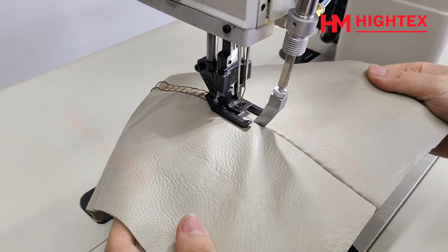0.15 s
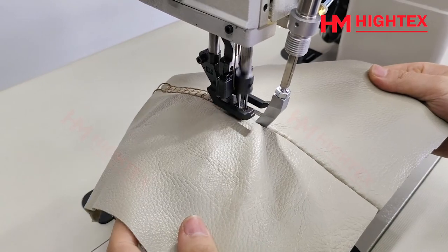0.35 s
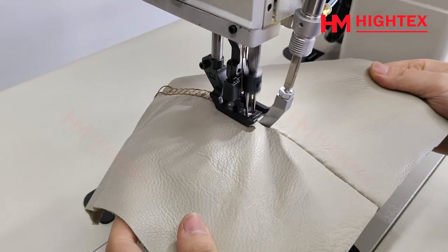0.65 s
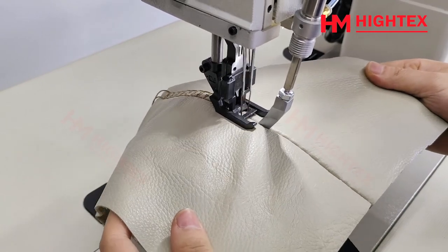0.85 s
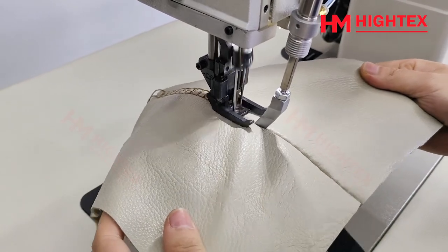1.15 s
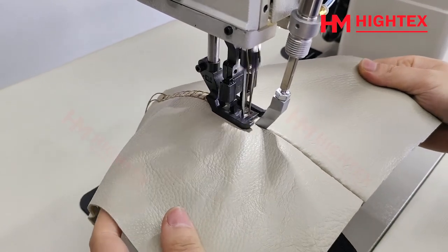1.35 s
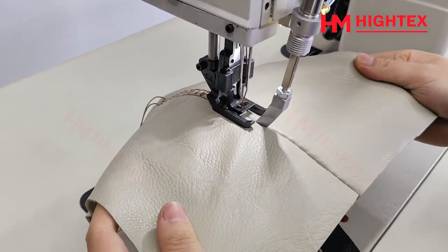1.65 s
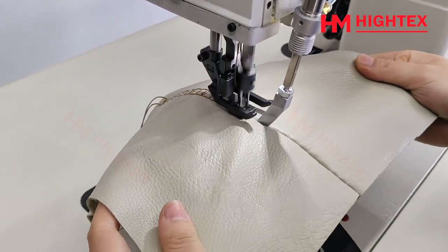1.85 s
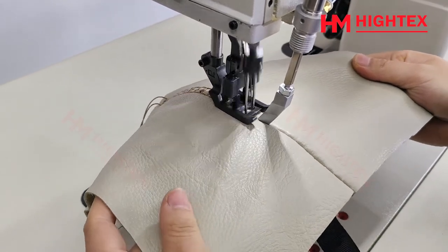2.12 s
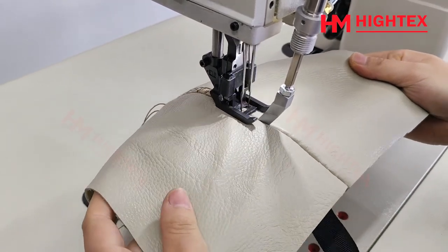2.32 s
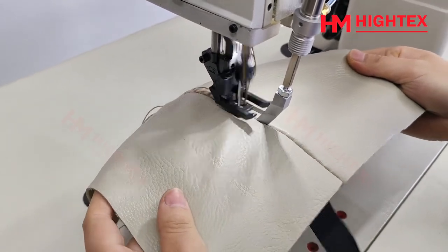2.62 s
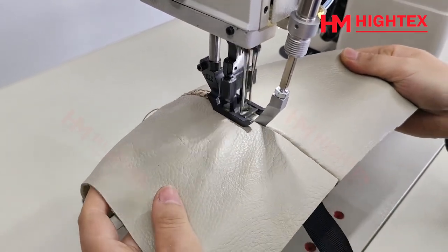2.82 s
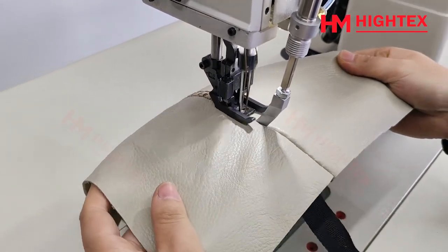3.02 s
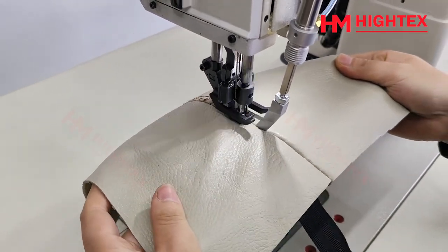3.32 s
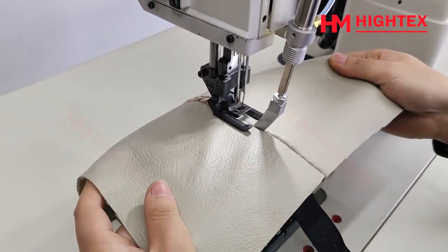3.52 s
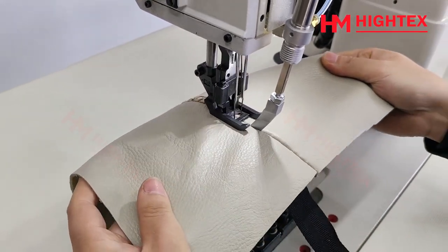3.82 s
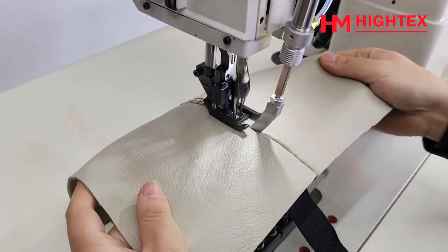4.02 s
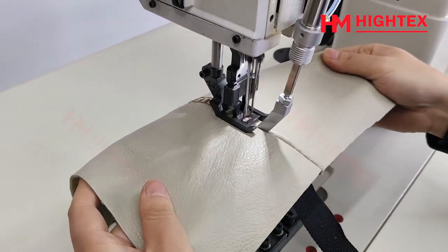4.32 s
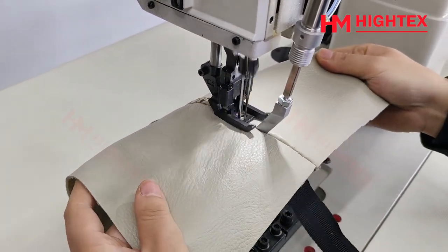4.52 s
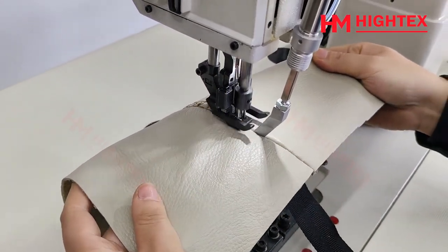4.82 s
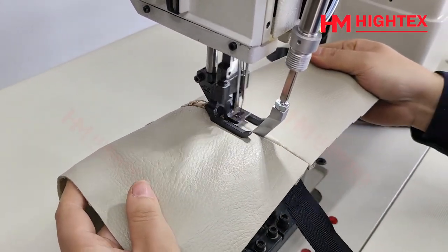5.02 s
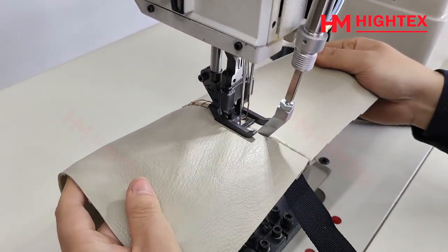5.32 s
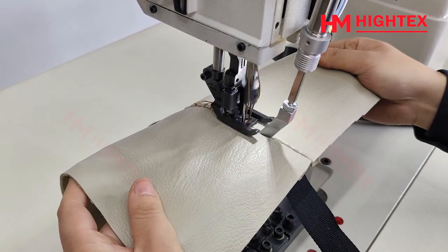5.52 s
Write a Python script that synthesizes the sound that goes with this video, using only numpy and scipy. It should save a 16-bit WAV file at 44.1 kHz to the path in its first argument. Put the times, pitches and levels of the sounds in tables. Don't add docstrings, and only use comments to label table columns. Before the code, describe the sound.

A close, dry stereo recording of an industrial sewing machine stitching leather slowly in a quiet indoor workshop. It starts right on a dull, low thud at 0 s; further thuds follow at about 0.75, 1.5, 2.25, 3.0, 3.75, 4.5 and 5.25 s. Each is a short boom near 90 Hz that jars the table panels into a brief rattle, brightest at 0.75 and strong at 3.0, softer at 3.75. About 0.1 s after each thud comes a needle click, at 0.2 s a sharp hook click, then lighter ticks. Near 0.47 s into each stitch the feet lift with a bright clack, followed by take-up clicks and a small snap, then a light touch just before the next thud. Faint high metallic pings occur at 3.9 and 4.7 s. Soft gear murmur and a very faint high whine remain beneath, the gaps nearly empty, until it cuts off mid-stitch around 5.6 s.

```python
import sys
import numpy as np
from scipy import signal
from scipy.io import wavfile
from scipy.ndimage import uniform_filter1d

SR = 44100
rng = np.random.default_rng(int(sys.argv[2]) if len(sys.argv) > 2 else 0)


def dump_mix(stems):
    frames = np.atleast_2d(stems).T
    limited = np.clip(frames, -1, 1)
    pcm = np.round(limited * 32767).astype(np.int16)
    wavfile.write(sys.argv[1], SR, pcm)


def invert_db(level):
    return 10 ** (np.asarray(level, dtype=float) / 20)


N = 249606

# crest_s, swing_db, pitch_hz, low_rattle_db, high_rattle_db
SLAMS = [
    (0.0099, -25.5, 90.4, -56, -66),
    (0.7578, -24.5, 88.4, -44.5, -46),
    (1.504, -25, 94.8, -41, -52.5),
    (2.252, -27.5, 90.2, -45.5, -61),
    (2.9993, -26, 90.2, -38, -49.5),
    (3.748, -28, 89.3, -51, -66.5),
    (4.496, -25.5, 91.1, -38.5, -67),
    (5.2429, -26, 89.4, -43.5, -55),
]
# crest_s, swing_db, width_s, rattle_db
REBOUNDS = [
    (0.0853, -88, 0.33, -53),
    (0.8377, -64, 0.2, -57),
    (1.5753, -45, 0.021, -56.5),
    (2.3323, -73, 0.0082, -67),
    (3.102, -50, 0.045, -60),
    (3.8461, -78, 0.033, -65),
    (4.5854, -48.5, 0.039, -80),
    (5.3423, -51.5, 0.032, -67),
]
# crest_s, swing_db, width_s, rattle_db
NEEDLE_LOW = [
    (0.199, -59, 0.027, -62.5),
    (0.9496, -48.5, 0.036, -63.5),
    (1.6837, -53, 0.054, -68),
    (2.4315, -55, 0.052, -62.5),
    (3.1789, -46.5, 0.051, -68),
    (3.937, -47.5, 0.08, -67),
    (4.6849, -46.5, 0.11, -64),
    (5.4345, -44.5, 0.12, -68),
]
# crest_s, swing_db, width_s, rattle_db
FEED_PUSH = [
    (1.1318, -53, 0.05, -75.5),
    (1.88, -52, 0.057, -78),
    (2.6151, -61.5, 0.039, -86),
    (3.3719, -56, 0.04, -77),
    (4.119, -52, 0.061, -79),
    (4.848, -61.5, 0.02, -104),
    (5.607, -78, 0.027, -68.5),
]
# crest_s, swing_db, width_s, rattle_db
FOOT_LIFT = [
    (0.5215, -48, 0.083, -73),
    (1.2786, -55.5, 0.061, -69),
    (2.0278, -54.5, 0.075, -75),
    (2.773, -50.5, 0.091, -80.5),
    (3.522, -53, 0.12, -68.5),
    (4.2705, -51.5, 0.082, -71.5),
    (5.018, -50, 0.094, -72.5),
]
# swings, pitch_hz, high_rattle_over_low_db
LIGHT_SWINGS = [
    (REBOUNDS, 98, -11),
    (NEEDLE_LOW, 89, -7.5),
    (FEED_PUSH, 95, -3.5),
    (FOOT_LIFT, 95.2, -5.5),
]
# pitch_hz, width_hz, level_db
LOW_PANELS = [(150.4, 13.5, 4), (195.4, 14, 0.5), (213.5, 9.4, -8)]
HIGH_PANELS = [(249.4, 34, 2), (301.8, 10, -3.5), (345, 31, -1), (430, 23, 0.5), (466, 48, 0.5),
               (619, 26, 0.5), (730.6, 27, 0)]

# pitch_hz, width_hz, level_db
NEEDLE_BAR = [(11973, 260, 1), (13600, 1660, -1.5), (15240, 2400, -3.5), (10040, 2000, -12)]
ARM = [(957, 117, 0), (1037, 53, 1), (1145, 44, 1), (757, 200, -6)]
BED_PLATE = [(3240, 3870, 4), (3852, 480, 0), (4110, 240, -5.5), (4790, 680, -0.5), (5510, 340, -11.5)]
HOOK = [(6584, 690, -3.5), (7860, 1020, -2), (8910, 2840, -5.5)]
LINKAGE = [(2000, 45, -2), (2140, 50, -7.5), (2263, 180, -2.5), (1506, 190, -4.5)]
# start_s, needle_bar_db, weight_db (what the other parts gain this time)
FOOT_DOWN = [
    (0.7153, -41.5, 2),
    (0.7265, -35, 0),
    (1.4635, -42, 2),
    (2.2114, -43, 2.5),
    (2.9587, -43, 3.5),
    (3.7063, -45.5, 2),
    (4.4523, -45.5, 3),
    (5.1992, -43, -8),
]
FOOT_BLOW = [
    (0., -52, 5.5),
    (0.7394, -39.5, 2),
    (1.4854, -46.5, 2),
    (2.2314, -49, 0),
    (2.98, -41, -1.5),
    (3.724, -54, -5),
    (4.4714, -40.5, -9.5),
    (5.2214, -45, -14),
]
NEEDLE_IN = [(0.099, -35.5, -2, -21), (0.841, -36.5, 3, -13), (0.848, -45, -2, 10.5),
             (1.5948, -38.5, 5, -3), (2.3337, -38, -13, 2), (2.3396, -39, 5, 0.5), (3.089, -41, 9.5, -5),
             (3.8307, -35.5, -2, 2.5), (4.57, -56.5, 10, 4), (4.584, -37.5, 5.5, -0.5),
             (5.3273, -34.5, -42, 0), (5.3333, -37, -3.5, 2)]
HOOK_CATCH = [
    (0.1955, -37.5, 8.5, -13),
    (0.9401, -42, -3, 18),
    (1.6865, -39, 2, 11.5),
    (2.4356, -41.5, -2, 3),
    (3.1858, -37.5, -1.5, 8.5),
    (3.931, -43.5, 11, 1),
    (4.6778, -41.5, 22, -5.5),
    (5.4264, -40, 0, -7),
]
# start_s, needle_bar_db, weight_db
HOOK_PASS = [
    (0.965, -44.5, 3.5),
    (1.714, -42.5, 1),
    (2.459, -43, 3),
    (3.2121, -43.5, -3),
    (3.9602, -35, -34),
    (4.7085, -53, 11.5),
    (5.452, -40, -10.5),
]
NEEDLE_OUT = [
    (0.2635, -46.5, -0.5),
    (1.0115, -49, -2),
    (1.7617, -49.5, -8),
    (2.507, -46.5, -5),
    (3.255, -51, 3.5),
    (4.0013, -47, -4),
    (4.7416, -49, 4),
    (5.4974, -47, 1.5),
]
SIDE_STEP = [
    (4.012, -53, -3),
    (4.087, -52, -9),
    (4.108, -63, -9),
    (1.0705, -44.5, 1),
    (2.5653, -46, 10.5),
    (4.061, -46.5, 1.5),
    (5.5578, -44.5, -1),
]
FEED_DOG = [
    (0.348, -52, -4),
    (1.0954, -57, -7),
    (1.8334, -53.5, -0.5),
    (3.3393, -54.5, -1),
    (4.0869, -57, -2),
    (4.8349, -51, -8.5),
    (5.5994, -65.5, 4),
]
# start_s, needle_bar_db, weight_db, linkage_over_arm_db
FOOT_UP = [
    (0.4653, -31, 1, -1),
    (1.2207, -39.5, -2, 8),
    (1.9653, -37, 7, -3.5),
    (2.7131, -35.5, 0.5, -1.5),
    (3.4538, -42, 8.5, -24),
    (3.4615, -33.5, 1, 3.5),
    (4.2067, -38.5, 4, -7.5),
    (4.9536, -32, 2, -7.5),
    (4.9546, -49, -17, -13),
]
TAKE_UP = [(0.5715, -39, -4, -10), (0.599, -53.5, 17.5, -2), (1.3162, -41, 5.5, 3), (2.0657, -44, 6.5, 9.5),
           (2.812, -49, -1.5, 14), (2.8357, -48.5, -5.5, 22), (3.5606, -47.5, -6, 18),
           (3.5867, -49.5, -0.5, 16), (4.3096, -40, 1, 6), (5.0564, -48.5, 2.5, 4), (5.0818, -51, 5, -2)]
# start_s, needle_bar_db, weight_db
THREAD_SNAP = [
    (0.635, -32.5, 6.5),
    (1.386, -42.5, -8),
    (2.133, -39.5, 5),
    (2.8814, -44, -9),
    (3.6286, -46, 5),
    (4.376, -46.5, 4.5),
    (5.124, -44, 6),
]
FOOT_SLACK = [
    (1.4424, -46.5, 0),
    (2.9362, -46, 0),
    (4.4323, -45, 0),
]
# contacts, (arm, bed_plate, hook)_over_needle_bar_db, share of weight each takes,
# tail_t60_s, crack_t60_s
CONTACTS = [(FOOT_DOWN, (-16.5, -9, -11), (4.3, 0.3, 0.16), 0.28, 0.016), (FOOT_BLOW, (-6.5, 1.5, -6),
            (0.21, 2.37, 0.47), 0.14, 0.01), (NEEDLE_IN, (-7, -6, -10), (1, 0.14, 0.014), 0.27, 0.013),
            (HOOK_CATCH, (-15.5, -12, 0.32), (0.74, .1, 0.16), 0.22, 0.0071), (HOOK_PASS, (-21.5, -5, -2),
            (2.27, 0.52, 0.25), 0.17, 0.015), (NEEDLE_OUT, (-75, -14, -2.4), (1.1, 1, 0.83), 0.24, 0.027),
            (SIDE_STEP, (-28, -20, -12.5), (0.96, 0.61, 0.51), 0.3, 0.0094), (FEED_DOG, (0, -13, -32),
            (0.94, 0.3, .3), 0.18, 0.0052), (FOOT_UP, (-6.5, -5.5, -8), (1.72, 0.35, 0.057), 0.29, 0.012),
            (TAKE_UP, (-17, -13.5, -1.4), (1, 0.89, 0.21), 0.29, 0.018), (THREAD_SNAP, (-52, -14.5, -6.5),
            (1.1, 1.74, 0.16), 0.18, 0.024), (FOOT_SLACK, (-50, -30, -7), (0, 0, 0), 0.09, 0.012)]
# start_s, needle_bar_db, other_parts_over_it_db
BOUNCES = [(0.188, -55, 9), (0.222, -51, 8), (0.4694, -39, -12), (0.476, -45, 5.5), (0.4826, -37, -12),
           (0.513, -46, 2), (0.604, -46, 1), (0.7265, -46, -15), (0.7308, -42, -7), (0.845, -35.5, -21),
           (0.849, -39, -15), (0.9433, -41, -20), (1.212, -40, -13), (1.223, -30.5, -17), (1.228, -41, -9),
           (1.3355, -55, -2), (1.6916, -54, 6), (1.7138, -56, 2), (1.7652, -45, -6), (1.9592, -60, -18),
           (1.9696, -26, -18), (2.1365, -54, -15), (2.1408, -53, -2), (2.2181, -44, -16), (2.3417, -34, -3),
           (2.4372, -42, -3), (2.7048, -41, -7), (2.742, -60.5, 18), (2.8117, -48, -1), (2.837, -40, -12),
           (2.8437, -42, -13), (3.091, -40, -24), (3.0965, -37, -26), (3.181, -59, 10), (3.4655, -30, -7),
           (3.7054, -45, -13), (3.8386, -40, -6), (4.202, -42.5, -3), (4.209, -33, -21), (4.225, -59, 15),
           (4.304, -48, 6), (4.309, -55, 0), (4.3269, -50, -1), (4.335, -49, 1), (4.455, -42, -4),
           (4.685, -53, 11), (4.711, -48, 6), (4.9611, -27, -4.5), (5.1324, -44, -16),
           (5.3293, -31.5, -5.5), (5.3365, -36, -3), (5.348, -51, -10), (5.4591, -44, 0), (5.502, -50, -11),
           (5.508, -54, 2), (5.57, -46, -9)]

# pitch_hz, width_hz, level_db
FOOT = [(1800, 240, -0.5), (3397, 180, -3), (3570, 20, -10), (5530, 350, -12.5)]
# start_s, level_db
FOOT_RINGS = [
    (0., -45),
    (0.7378, -45.5),
    (0.749, -51),
    (1.481, -42),
    (2.2323, -52.5),
    (2.978, -49.5),
    (3.721, -61),
    (4.4715, -70.5),
    (5.2206, -57.5),
]
# middle_s, level_db, pitch_hz, length_s
PANEL_HUMS = [(0.024, -42.5, 265.5, 0.045), (0.043, -51, 345, .04), (0.228, -61, 258.7, 0.084),
              (0.503, -64, 614, 0.046), (0.664, -63.5, 406, 0.064), (0.749, -62.5, 913, 0.048),
              (0.81, -41, 207, 0.039), (0.873, -61.5, 623, 0.056), (0.972, -65, 408, 0.048),
              (1.255, -66.5, 254.5, 0.057), (1.344, -63.5, 632, 0.047), (1.512, -53, 526, 0.046),
              (1.63, -61.5, 262, 0.056), (1.718, -74, 407, 0.1), (2.035, -67.5, 255, 0.082),
              (2.119, -70, 432, 0.12), (2.253, -60.5, 640, 0.037), (2.268, -52.5, 251.7, 0.046),
              (2.365, -63, 627, 0.047), (2.374, -70, 263, 0.034), (2.737, -65, 642, 0.07),
              (2.994, -49, 663.5, 0.034), (3.01, -50, 469.4, 0.044), (3.12, -52.5, 185.5, 0.11),
              (3.222, -68, 261.5, 0.069), (3.332, -66.5, 188, 0.046), (3.484, -54, 620, 0.044),
              (3.561, -72, 254, 0.14), (3.568, -67.5, 674, 0.047), (3.758, -59, 458, 0.044),
              (3.871, -64.5, 400, 0.063), (4.33, -64, 246, 0.073), (4.495, -66, 555, 0.058),
              (4.69, -66, 491, 0.049), (4.687, -68, 905, .04), (5.0, -59.5, 162.6, 0.041),
              (5.28, -55, 430, 0.036), (5.13, -68, 137, 0.051), (5.263, -60, 706, 0.05),
              (3.015, -39, 188.5, 0.039), (0.062, -41.5, 197.7, 0.033), (0.786, -46.5, 325.6, 0.028),
              (1.53, -54, 187, .03), (5.427, -59.5, 503, 0.014), (5.59, -67.5, 150.4, 0.065),
              (3.355, -68.5, 475, 0.046), (3.47, -64.5, 149, 0.067), (2.593, -68.5, 191, 0.036),
              (4.33, -68, 159, 0.053)]
# middle_s, level_db, pitch_hz, length_s
PART_RINGS = [(0.017, -53.5, 3460, 0.026), (0.098, -57, 3600, 0.014), (0.375, -73, 1670, .035),
              (0.478, -47, 4720, 0.0057), (0.48, -46, 1007, 0.012), (0.509, -49.5, 2140, 0.021),
              (0.748, -49, 3470, 0.017), (1.122, -77.5, 1504, 0.019), (2.002, -54.5, 1030, 0.023),
              (2.348, -55.5, 1800, 0.019), (2.751, -58, 3650, 0.018), (2.842, -59, 2010, .015),
              (3.852, -58.5, 2093, 0.029), (4.116, -71, 1470, 0.034), (4.22, -62, 4080, .01),
              (4.349, -68.5, 1500, 0.035), (4.856, -71.5, 1650, 0.025), (4.955, -51, 4050, 0.0057),
              (4.963, -49, 1063, 0.0067), (5.125, -57, 4430, 0.0095), (5.479, -68, 1370, 0.022),
              (1.623, -56, 1103, .04), (1.491, -52, 5300, .012), (2.135, -59, 4800, .01)]
# start_s, level_db, pitch_hz
TICKS = [
    (0.7143, -43, 13800),
    (3.705, -42, 13600),
    (3.9317, -32.5, 6700),
    (4.681, -36, 7050),
    (5.2007, -45, 13200),
]

# time_s, level_db
LOAD = [
    (0.0, 10.5),
    (0.35, 1),
    (0.84, 3),
    (2.0, 0.5),
    (2.25, 3),
    (2.8, 0),
    (3.2, -1.5),
    (4.3, 1),
    (5.3, 2.5),
    (5.66, 2.5),
]
# pitch_hz, width_hz, level_db
GEAR_CASE = [(735, 15, -1), (1070, 41, -10), (5300, 900, -13)]
# pitch_hz, level_db
MURMUR_COLOUR = [(300, -12.5), (500, -6), (733, -4), (1150, -8.5), (3000, -22.5), (6500, -24.5),
                 (12000, -31.5), (16000, -14.5)]
RUMBLE_COLOUR = [(30, -43.5), (120, 1), (250, -17.5), (420, -11), (550, -22.5), (16000, -53)]
# pitch_hz, width_hz, level_db
WHINE = [(10000, 6, 0), (9904, 8, -7), (14856, 40, -6)]
# time_s, level_db
WHINE_LOAD = [(0, -81), (0.5, -87.5), (1.2, -85.5), (1.9, -85.5), (2.4, -85), (3, -85), (4.15, -76.5),
              (4.3, -100), (4.6, -91), (5.66, -88)]
# pitch_hz, likeness (0 to 1)
SAME = [(60, .99), (250, .8), (500, .5), (1000, .4), (4000, .35), (16000, .35)]
# pitch_hz, left_leads_rad
LEAD = [(300, 0), (520, -.4), (780, -2.8), (1210, -4.1), (1640, -2.9), (2070, -4.3), (2840, -9.8),
        (5170, -6.6)]
# pitch_hz, left_over_right_db
LEAN = [(640, 0), (1400, -1), (3100, -.5), (6800, 2), (11000, 6.5), (15000, 11)]


def evened(x):
    return x / np.sqrt(np.mean(x ** 2) + 1e-20)


def read(points, hz):
    f, value = np.transpose(points)
    return np.interp(np.log(hz + 1), np.log(f + 1), value)


def add(mix, s, sound):
    at = round(s * SR)
    sound = sound[max(-at, 0):]
    part = mix[max(at, 0):][:len(sound)]
    part += sound[:len(part)]


def ports(colour=((20, 0), (20000, 0)), patchy_db=0.):
    frames, hz = N // 128 + 5, np.fft.rfftfreq(512, 1 / SR)
    a, b, c, d, patch = rng.standard_normal((frames, 257, 5)).T
    patch = uniform_filter1d(uniform_filter1d(patch, size=6, axis=0), size=20, axis=1)
    level = invert_db(read(colour, hz)[:, None] + patchy_db * evened(patch))
    same = np.clip(read(SAME, hz), 0, 1)[:, None]
    left = a + 1j * b
    right = same * left + np.sqrt(1 - same ** 2) * (c + 1j * d)
    right = right * np.exp(-1j * read(LEAD, hz))[:, None]
    lean = invert_db(read(LEAN, hz) / 2)[:, None]
    z = np.array([left * lean, right / lean]) * level
    pair = signal.istft(z, nperseg=512, noverlap=384)[1][:, :N]
    return pair / np.sqrt(np.mean(pair.mean(0) ** 2))


def ring(x, modes):
    t, body = np.arange(4096) / SR, 0
    for k, (hz, width, db) in enumerate(modes):
        decay = np.sqrt(width) * np.exp(-np.pi * width * t)
        body = body + (-1) ** k * invert_db(db) * decay * np.sin(2 * np.pi * hz * t)
    return signal.oaconvolve(x, body[None] / np.linalg.norm(body), axes=1)[:, :N]


def swings():
    slam_width_s = 0.057
    rows = [(s, db, slam_width_s, hz, low_db, high_db) for s, db, hz, low_db, high_db in SLAMS]
    for light, hz, high_db in LIGHT_SWINGS:
        rows += [(s, db, width, hz, rattle_db, rattle_db + high_db) for s, db, width, rattle_db in light]
    return rows


def table_top(sharp=22.0, knock_share=0.33, late_s=0.0052, t60=0.19, blunt=.35):
    swing, jolts = np.zeros(N), np.zeros((2, N))
    jitter = evened(signal.lfilter([1], [1, -.9], rng.standard_normal(N)))
    for s, db, width, hz, *rattle_db in swings():
        t = np.arange(-.9 * width, .3, 1 / SR)
        bell = np.cos(np.pi / 2 * np.clip(t / (0.72 * width), -1, 1)) ** 2
        push = np.tanh(blunt * bell ** np.where(t < 0, 1.1, 1.5)) / blunt
        hum = invert_db(-26.5 - 60 * np.maximum(t, 0) / 1.28) * np.clip(t / width, 0, 1)
        wave = np.cos(2 * np.pi * hz * t * (1 + 3.5 * t * bell))
        add(swing, s + t[0], invert_db(db) * (push + hum) * wave)

        crests = evened(np.exp(sharp * np.cos(2 * np.pi * hz * t)) - np.i0(sharp))
        build = np.clip((t - t[0]) / (late_s - t[0]), 0, 1) ** 1.22
        rattle = np.where(t < late_s, build, invert_db(-60 * (t - late_s) / t60))
        at = np.clip(np.round((s + t) * SR).astype(int), 0, N - 1)
        drive = rattle * (knock_share * crests * bell + (1 - knock_share) * jitter[at])
        for jolt, level_db in zip(jolts, rattle_db):
            add(jolt, s + t[0], invert_db(level_db) * drive)
    swing = invert_db(2.0) * signal.sosfiltfilt(signal.butter(2, 52., "high", fs=SR, output="sos"), swing)
    low, high = ring(jolts[:1], LOW_PANELS)[0], ring(jolts[1:], HIGH_PANELS)[0]
    panels = invert_db(-9.5) * low + invert_db(-2.5) * high
    aside = invert_db(-7.0) * np.roll(np.gradient(panels), 260) * 14
    pair = np.array([np.roll(swing, 8), swing]) * invert_db([[-.2], [.2]])
    return pair + np.array([np.roll(panels, 8) + aside, panels - aside])


def contacts():
    kinds = []
    for rows, over_db, share, t60, crack_t60 in CONTACTS:
        levels = []
        for s, db, weight_db, *link_db in rows:
            others_db = np.add(over_db, np.multiply(share, weight_db))
            levels.append((s, db + np.r_[0, others_db, others_db[0] + sum(link_db)]))
        kinds.append((levels, t60, crack_t60))
    return kinds


def clicks(swell_s=0.0044, swell_db=-22, droop=1.0, bounce_t60=0.011, bounce_rise_s=0.0023):
    # modes, level_db, t60 factor, rise_s, tail_under_crack_db, bounce_db; the heavy arm builds slowly
    parts = [(NEEDLE_BAR, -3, .8, .0012, -13, 8),
             (ARM, -8.5, 1.25, .006, -1, -6),
             (BED_PLATE, -3, 1.1, .002, -7, 3),
             (HOOK, -1, .9, .0015, -10, 4),
             (LINKAGE, -9.5, 1.15, .005, -2, -6)]
    t, out = np.arange(-.016, .32, 1 / SR), np.zeros((2, N))
    after, brief = np.maximum(t, 0), np.arange(500) / SR
    swell = invert_db(2 * swell_db) * np.exp(np.minimum(t, 0) / swell_s) * (t < .002)
    bounce = (1 - np.exp(-brief / bounce_rise_s)) ** 2 * invert_db(-120 * brief / bounce_t60)
    for k, (modes, part_db, longer, rise_s, tail_db, bounce_db) in enumerate(parts):
        power = np.zeros(N)
        for rows, t60, crack_t60 in contacts():
            tail = invert_db(2 * tail_db - 147.7 * (after / (longer * max(t60, .02))) ** droop)
            crack = invert_db(-120 * after / crack_t60)
            shape = swell + (1 - np.exp(-after / rise_s)) ** 2 * (crack + tail)
            for s, level_db in rows:
                add(power, s - .0015 + t[0], invert_db(2 * level_db[k]) * shape)
        for s, db, others_db in BOUNCES:
            add(power, s - .001, invert_db(2 * (db + bounce_db + (k > 0) * others_db)) * bounce)
        contact = ports(patchy_db=3.6)
        out += invert_db(part_db) * ring(np.sqrt(power) * contact, modes)
    return signal.sosfilt(signal.butter(4, 560, "high", fs=SR, output="sos"), out)


def feet(rise_s=0.0021, t60=0.17):
    t, strength = np.arange(0, .2, 1 / SR), np.zeros(N)
    for s, db in FOOT_RINGS:
        add(strength, s - .004, (1 - np.exp(-t / rise_s)) ** 2 * invert_db(db - 60 * t / t60))
    return ring(strength * ports(patchy_db=3.0), FOOT)


def chatter(depth_db=0.87, grain_s=0.0044):
    grains = uniform_filter1d(rng.standard_normal(N), round(grain_s * SR))
    return evened(invert_db(depth_db * evened(uniform_filter1d(grains, size=40))))


def panel_hums(spread=0.0942):
    events = PANEL_HUMS + PART_RINGS
    out, draws = np.zeros((2, N)), rng.random((len(events), 2, 3))
    for (s, db, hz, length), phases in zip(events, draws):
        t = np.arange(-length, length, 1 / SR)
        bell = invert_db(db) * np.cos(np.pi * t / (2 * length)) ** 2
        partials = hz + min(spread * hz, 110.) * np.array([[-1.], [0], [.8]])
        for port, shift in enumerate((0, .12)):
            phase = phases[0] + shift * min(hz / 300, 2.) * phases[1]
            turns = partials * np.arange(len(t)) / SR + phase[:, None]
            hum = (invert_db([[-5], [0], [-5]]) * np.cos(2 * np.pi * turns)).sum(0)
            add(out[port], s - length, bell * hum)
    return out


def ticks(t60=0.013, rough=0.41, rise_s=0.00082):
    t, out = np.arange(0, .03, 1 / SR), np.zeros((2, N))
    for (s, db, hz), grit in zip(TICKS, rng.standard_normal((len(TICKS), 2, len(t)))):
        for port, side in enumerate((.5, -.5)):
            ping = np.sin(2 * np.pi * hz * t) + rough * (hz / 17000.0) ** 2 * np.gradient(grit[port])
            fade = invert_db(db + side * read(LEAN, hz) - 60 * t / t60)
            add(out[port], s, fade * np.minimum(t / rise_s, 1) * ping)
    return out


def servo_whine():
    t, hiss, lines = np.arange(N) / SR, ports(), 0
    for hz, width, db in WHINE:
        tone = np.sin(2 * np.pi * hz * t) * invert_db(read(LEAN, hz) * np.array([[.5], [-.5]]))
        lines = lines + invert_db(db) * (0.4 * ring(hiss, [(hz, width, 0)]) + tone)
    return invert_db(np.interp(t, *np.transpose(WHINE_LOAD))) * lines


def murmur(gears_db=-72, rumble_db=-77.5, rumble_per_load=1.9, fall_db_per_s=13):
    t = np.arange(N) / SR
    load_db, slams = np.interp(t, *np.transpose(LOAD)), np.array(SLAMS)[:, 0]
    since = t - slams[np.maximum(np.searchsorted(slams, t) - 1, 0)]
    calm_db = uniform_filter1d(fall_db_per_s * since, size=2000)
    gears = ports(MURMUR_COLOUR, patchy_db=5.) + invert_db(-6.) * ring(ports(patchy_db=6.), GEAR_CASE)
    rumble = ports(RUMBLE_COLOUR, patchy_db=4.5)
    rumble = invert_db(rumble_db + rumble_per_load * load_db - calm_db) * rumble
    return invert_db(gears_db + load_db) * gears + rumble


def scene():
    top, metal, steady = table_top(), clicks(), murmur() + servo_whine()
    return top + steady + (metal + feet()) * chatter() + panel_hums() + ticks()


def quieted(x, floor_db=-103., depth_db=-9.):
    z = signal.stft(x, nperseg=1024, noverlap=768)[2]
    power = uniform_filter1d((abs(z) ** 2).mean(0), size=5, axis=1)
    keep = np.maximum(1 - invert_db(2 * floor_db) / (power + 1e-20), invert_db(depth_db))
    keep = uniform_filter1d(keep, size=3, axis=1)
    return signal.istft(z * keep, nperseg=1024, noverlap=768)[1][:, :N]


def top_cut(x):
    return signal.sosfilt(signal.butter(12, 16490, fs=SR, output="sos"), x)


def record(dry):
    edge = signal.firwin(511, 15750, window=("kaiser", 9), fs=SR)
    mix = signal.oaconvolve(quieted(dry), edge[None], "same")
    return top_cut(mix)


dry = scene()
out = record(dry)
dump_mix(out)
```